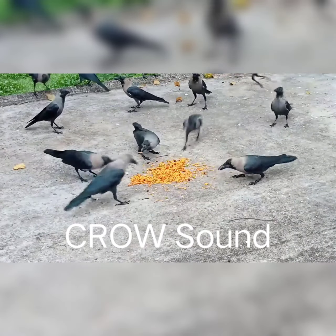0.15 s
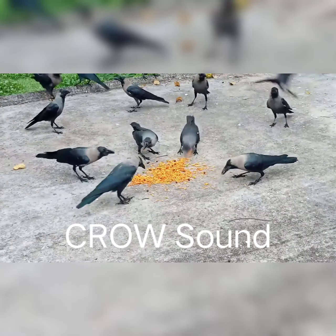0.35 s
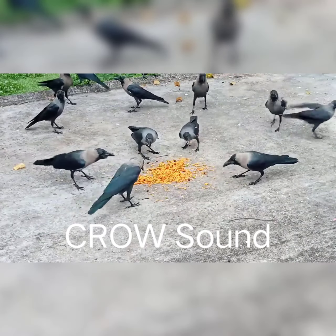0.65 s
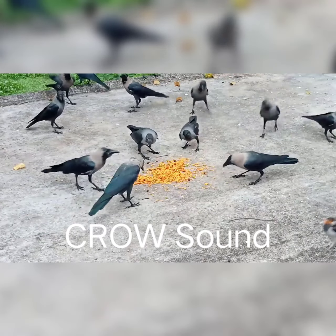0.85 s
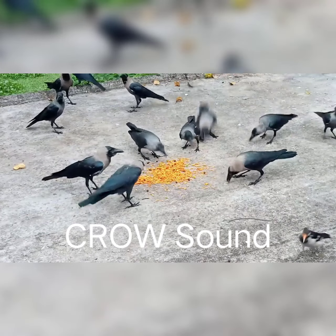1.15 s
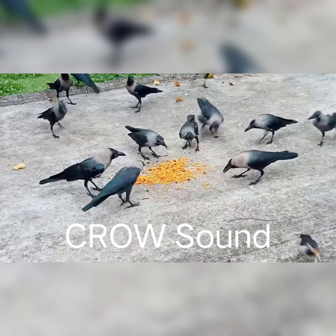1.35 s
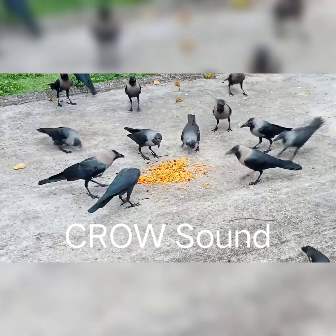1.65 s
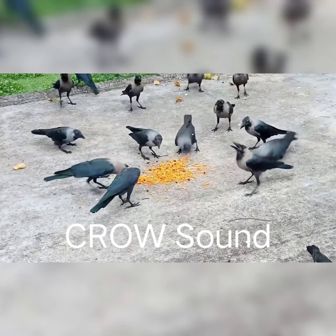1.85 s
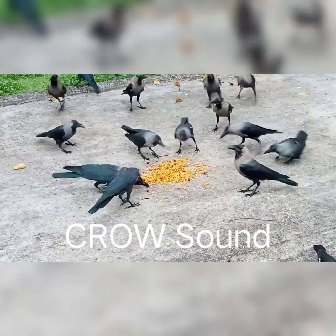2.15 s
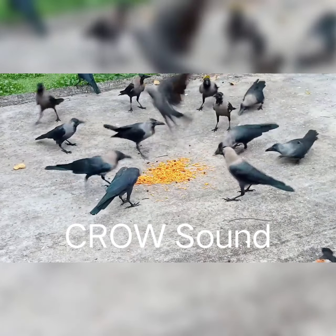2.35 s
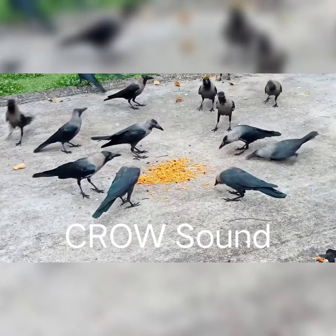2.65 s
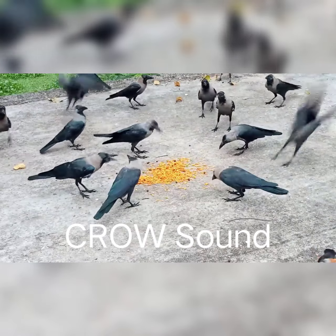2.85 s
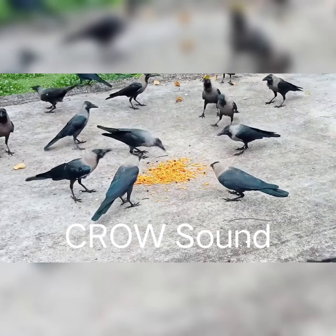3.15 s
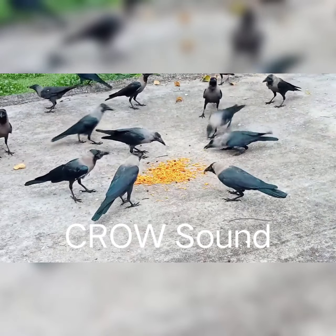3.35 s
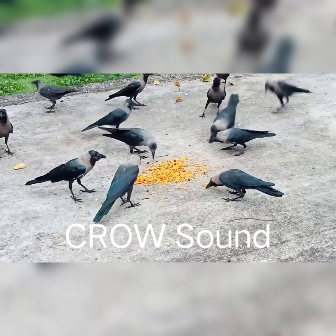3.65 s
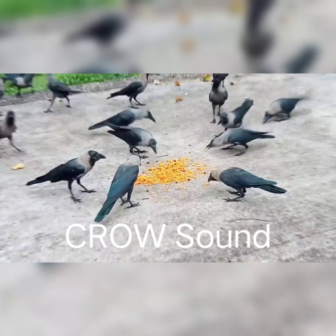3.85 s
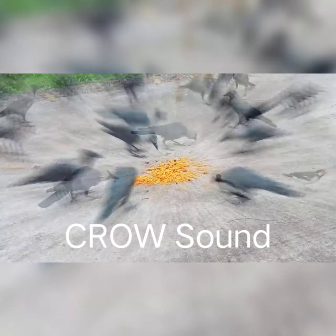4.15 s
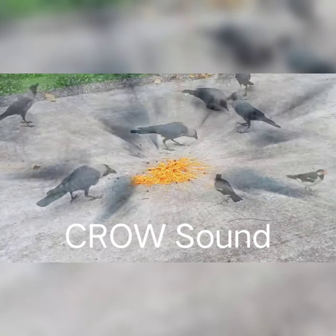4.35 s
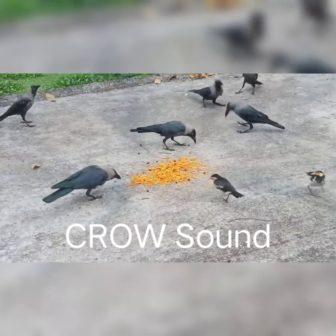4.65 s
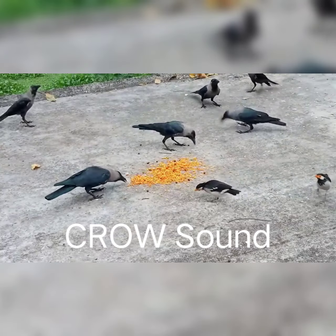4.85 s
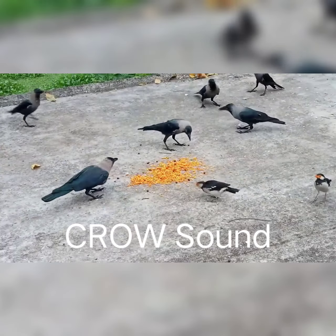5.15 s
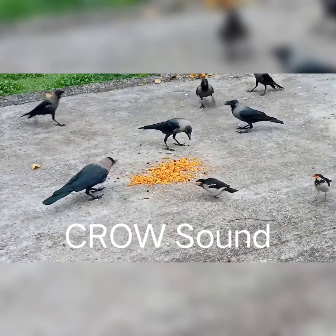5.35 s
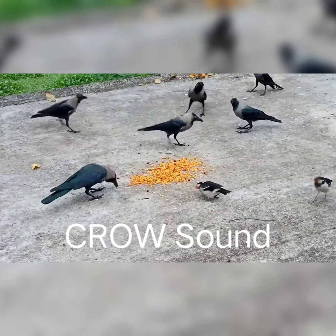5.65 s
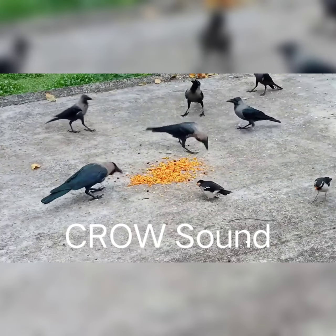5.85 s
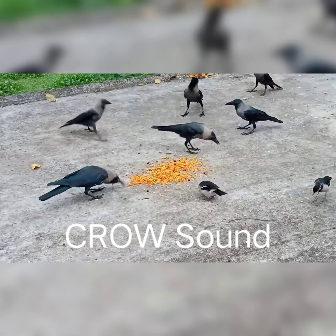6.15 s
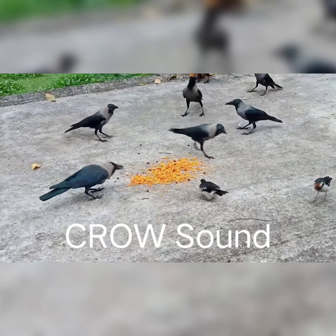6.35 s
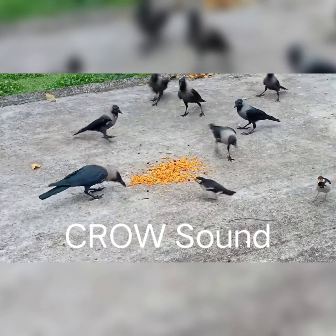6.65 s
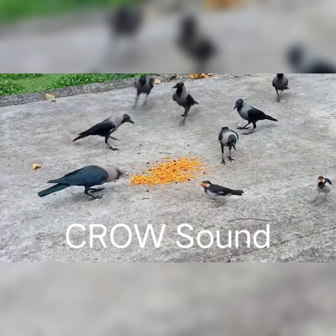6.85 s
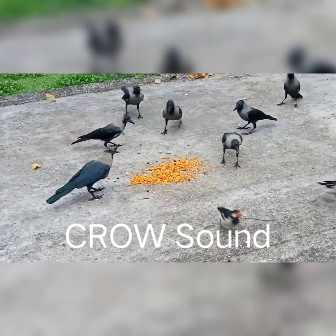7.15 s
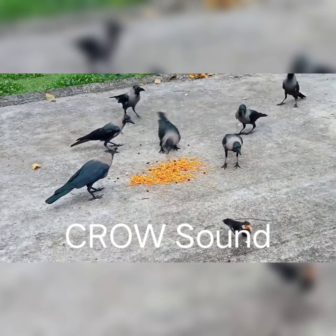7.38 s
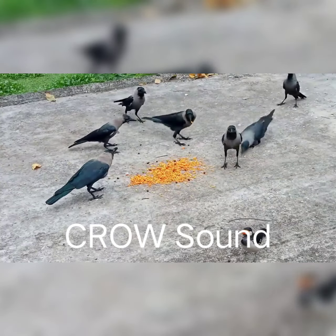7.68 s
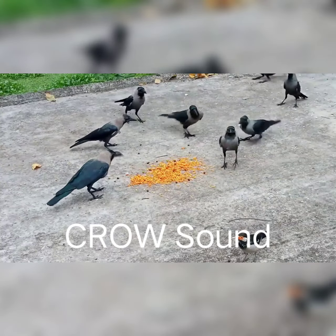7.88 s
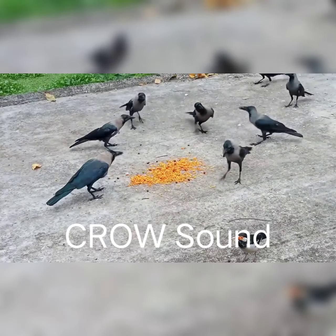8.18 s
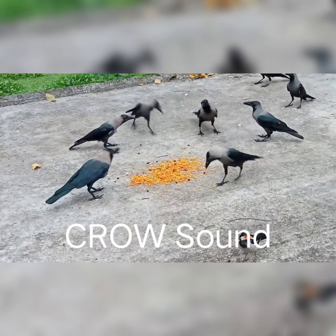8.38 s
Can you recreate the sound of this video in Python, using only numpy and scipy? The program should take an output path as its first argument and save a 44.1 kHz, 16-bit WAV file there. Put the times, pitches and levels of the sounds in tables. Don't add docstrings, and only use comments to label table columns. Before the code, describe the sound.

Harsh nasal caws, each about a third of a second, arch up and collapse in pitch, some near and bright, others duller. They crowd the first two seconds, then space out; one loud caw comes before an abrupt scene change. Afterwards there are few calls, low wind thumps and sparse pecking clicks until several caws return at the end. Faint small birds and distant cooing sit behind, with slight outdoor echo.

```python
import sys
import numpy as np
from scipy import signal
from scipy.fft import rfft, irfft, next_fast_len
from scipy.io import wavfile
from scipy.ndimage import uniform_filter1d, map_coordinates

SR = 44100
rng = np.random.default_rng(int(sys.argv[2]) if len(sys.argv) > 2 else 0)


def volts(x):
    e = np.asarray(x, float) / 20
    return 10 ** e


def store_wav(level_fs):
    pcm = np.round(np.clip(np.atleast_2d(level_fs), -1, 1) * 32767)
    wavfile.write(sys.argv[1], SR, pcm.T.astype(np.int16))


N = 375732

# (start [s], length [s], top pitch [Hz], top level [dB], loss by
# tiring [dB])
CAWS = [(-.07, .3, 510.5, -19, 4.5), (0.511, 0.33, 544.3, -20.5, 6.5), (1.035, 0.29, 485.7, -22, 6.5),
        (1.413, 0.33, 554, -26, 5.5), (1.649, 0.3, 577.7, -21.5, 0), (1.987, 0.31, 513.7, -18, 5),
        (2.863, 0.29, 549.5, -21, 2.5), (3.738, 0.32, 534.3, -13, 5.5), (4.176, 0.31, 537.5, -37.5, 3),
        (4.394, 0.29, 513.6, -19, 1.5), (5.039, 0.35, 493, -52.5, 4), (6.085, 0.32, 520.2, -20.5, 1.5),
        (7.491, 0.3, 486.3, -33.5, 4), (7.839, 0.35, 524.4, -15, 6), (8.186, 0.295, 520.8, -18, 2.5),
        (-.2, 0.32, 479.4, -16.5, 5.5), (1.416, 0.29, 654, -28.5, 7), (1.99, 0.27, 443, -15.5, 4.5),
        (2.073, 0.27, 485, -20.5, 5.5), (4.348, 0.27, 465.4, -22.5, -1), (7.953, 0.31, 592, -26.5, -0.5),
        (1.583, 0.25, 476, -30.5, -6)]
# (onset stretch [times], pitch lost over the hold [share],
# part of that lost by mid-hold [share], chest fading [dB])
BENDS = [(1, 0.12, .4, 8.5), (1, 0.1, .5, 5.5), (1, 0.098, 0.19, 1), (1, 0.063, 0.12, -2),
         (1, .09, 0.27, 5.5), (1, 0.085, 0.42, 4.5), (1, 0.098, .25, 3.5), (.9, .16, .3, 10.5),
         (1, .08, 0.33, 2.5), (1, 0.11, .35, 8.5), (1.1, 0.097, .35, 9), (1.2, .08, .15, 6),
         (0.88, .1, 0.22, 5.5), (1.2, .17, 0.27, 9.5), (0.649, 0.16, .15, 12), (1.001, .09, .35, 5),
         (1, 0.1, 0.21, 0), (0.999, 0.057, 0.245, 7.5), (1, .12, 0.38, 9.5), (0.66, 0.046, .35, 5.5),
         (0.77, .07, .35, 8), (1.2, 0.088, 0.31, 1)]
FALLS = [1, 1, 1.1, 1, .55, .65, 1, 1.1, 1, .75, 1, 1, .9, 1.1, 1, 1, 1, .6, .6, 1, 1, .7]
# (time after the start [s], pitch [share], level [dB])
ONSET = [
    (0, .8, -27),
    (.022, .92, -9),
    (.06, 1, 0),
]
# (time before the end [s], pitch [share], level [dB])
COLLAPSE = [
    (.075, 1, 0),
    (.045, .9, -6),
    (.028, .73, -18),
    (.004, .45, -38),
]
# (flutter [Hz], pitch swing [share], throb [dB], rasp [0-1], beak resonance, or for
# the # two near 600 Hz a boost of the fundamental [Hz])
VOICES = [(80.3, 0.03, 3.5, 0.56, 3700), (71.4, 0.082, 1, 0.5, 4120), (76.8, 0.022, 3, 0.98, 5000),
          (81.5, 0.033, 1.5, 0.8, 3980), (70.43, 0.064, 1.5, 0.9, 602), (74, 0.042, -2, 0.38, 4040),
          (75.64, 0.047, 1, 0.6, 3940), (74.6, 0.035, 1, 0.9, 4260), (75, 0.083, 2, 0.84, 7600),
          (75.64, 0.063, 0, 0.6, 3820), (69.9, 0.054, 3, 0.76, 4000), (75.4, 0.043, 2, 0.9, 3770),
          (83.6, 0.072, 2, 0.42, 5100), (84.6, 0.038, 2.5, 1, 4300), (74.9, 0.077, 2, 0.7, 1740),
          (66.8, 0.115, 2, 0.3, 4000), (69.2, 0.098, 4, 0.18, 580), (66.4, 0.039, 5, 0.11, 3450),
          (69.7, 0.012, -1, 0.56, 2520), (80.9, 0.012, -6, 0, 4050), (83.3, 0.021, -5, 0.5, 4300),
          (70.7, 0.032, 4, 0.2, 3700)]
# (frequency [Hz], level [dB])
CROW_COLOUR = [(250, -76), (520, -32.5), (800, -12), (1080, -8.5), (1500, -3.5), (2050, 8), (2600, -7.5),
               (3400, -17.5), (4300, -20.5), (5140, -26), (7080, -11), (11300, -33), (16000, -37)]
TRACT_HZ = [1075, 1454, 2610, 7240]
TRACT_WIDTHS = [0.15, 0.26, 0.18, 1, 0.1]
# (chest [dB], throat [dB], mouth [dB], hiss [dB], beak or boosted fundamental
# [dB])
TRACTS = [(4.5, -13.5, -11, -13.5, -12), (11.5, 7, 4, -2.5, 4), (2, -10.5, -9.5, -10.5, -6),
          (-1.5, 2.5, 4, 1, 17), (7.5, 0.5, 12.5, 11.5, 17.5), (14.5, 2, 3.5, 1.5, 10),
          (13.5, 10, 2.5, 4.5, 8.5), (7.5, -8.5, 7.5, -6.5, 11), (6.5, 9, 10, -12.5, -30),
          (6, -5.5, -2, -2, 3.5), (19, 18, 10, 8, -4.5), (5.5, -1.5, -6.5, -4.5, 5.5),
          (-1, -14, -9, -13.5, -2), (7, -9, 4.5, -6.5, 10), (5, -13.5, -2.5, -9, 2.5),
          (16, 1.5, 13, 9.5, 5), (10.5, 21.5, 23, -6, 25.5), (-68, 4, -8, -15, 9),
          (-31, -26, -11, -7, 16.5), (-44, -8.5, -8, -19, 17), (-32, 0, -0.5, 0.5, 11), (-9, 0, 6, 0, 3)]
FACING = [-40, -42.5, 1.5, 4, 7, 8.5, 7, -23.5, -25, 8.5, 5, 8.5, 5, 3, -0.5, 9, -12.5, 5, 1, -2, 5, 1]
# (throat [Hz], strength [dB], beak [Hz], strength [dB], beak [Hz], strength [dB])
POCKETS = [(2130, 5, 3120, 5, 4280, 6), (2020, 4, 4060, 7, 4700, 7), (1890, 4, 3390, 5, 4030, 8),
           (2190, 5, 2610, 3, 3990, 7), (2290, 4, 2720, 4, 3530, 4), (1760, 4, 3400, 4, 4000, 8),
           (1750, 7, 2840, 7, 4130, 8), (2090, 4, 3190, 4, 4290, 5), (2100, 3, 2490, 7, 3400, 6),
           (1930, 4, 3130, 5, 3950, 5), (2000, 2, 3000, 2, 4000, 2), (2010, 5, 3900, 9, 4280, 8),
           (1850, 3, 3100, 6, 4100, 6), (2070, 4, 3100, 7, 4300, 7), (1820, 5, 2690, 4, 4250, 6),
           (2500, 4, 2750, 4, 3600, 2), (1290, 3, 2200, 2, 4000, 2), (1780, 4, 2280, 2, 4030, 4),
           (2090, 3, 2750, 5, 4030, 5), (2250, 3, 2770, 4, 4300, 3), (2350, 5, 2690, 6, 3410, 4),
           (1840, 3, 2300, 2, 4300, 2)]
# (frequency [Hz], strength [dB])
NOSTRILS = [(7080, 4), (7560, 3)]
# (time [s], rustle [dB])
STIR = [(0, -41), (.35, -48.5), (.7, -43), (.95, -58.5), (1.36, -54.5), (1.97, -41.5), (2.4, -53),
        (2.7, -56.5), (3.4, -60), (3.72, -49), (4.44, -50.5), (4.6, -44), (4.85, -61), (6, -63.5),
        (6.55, -58), (7.1, -66), (7.6, -58.5), (8.53, -47.5)]
# (middle [s], half length [s], peak [dB])
GUSTS = [(4.464, 0.0072, -33), (4.6, 0.095, -39.5), (4.934, 0.025, -34.5), (5.056, 0.075, -38),
         (5.139, 0.045, -29), (5.21, 0.0075, -29), (5.308, 0.035, -39.5), (5.426, 0.036, -36),
         (5.5, 0.02, -39), (5.662, 0.084, -45.5), (5.871, 0.017, -45.5), (5.961, 0.022, -49),
         (6.285, 0.25, -49.5), (6.477, 0.025, -38.5), (6.641, 0.041, -38), (7.002, 0.039, -59),
         (7.749, 0.037, -53), (7.856, 0.026, -47.5), (8.152, 0.072, -59), (8.424, 0.028, -35),
         (8.496, 0.0074, -46)]
# (frequency [Hz], level [dB])
TOWN_COLOUR = [(25, -42.5), (60, -15.5), (98, 3.5), (129, -4.5), (165, -5), (201, -0.5), (260, -8.5),
               (600, -10.5), (900, -16), (2000, -22), (4000, -71)]
# (frequency [Hz], level [dB])
RUSTLE_COLOUR = [(800, -14.5), (1500, 11), (2300, 14), (3500, 16.5), (4200, 9), (5100, -2), (6300, 6.5),
                 (7570, 12), (9300, 1), (10400, -1), (16000, -10)]
# (frequency [Hz], level [dB])
BUFFET_COLOUR = [(12, -80.5), (20, -66), (32, -44), (56, -11.5), (97, -6), (236, -26), (400, -40),
                 (520, -74), (880, -120)]
# (frequency [Hz], decay time [s])
WALL_DECAY = [(500, 0.13), (2000, 0.39), (4000, 0.39), (12000, 0.088)]
# (start [s], length [s], top pitch [Hz], last pitch [Hz], level [dB])
CHIRRS = [(.755, 0.12, 3420, 3270, -45), (.655, 0.07, 3380, 3250, -49), (.56, .09, 4100, 4000, -51),
          (.64, .02, 3750, 3600, -44), (3.51, .17, 3950, 4350, -60), (3.67, 0.11, 3400, 4200, -48),
          (.13, .28, 3880, 3830, -57), (.18, .29, 4980, 4780, -60), (.3, .17, 3450, 3600, -56),
          (.2, .2, 4450, 4400, -62), (.78, .07, 3760, 3720, -57), (.87, .08, 3350, 3300, -57),
          (3.5, .13, 2950, 3000, -62), (.2, .12, 3400, 3350, -60), (.478, .04, 3300, 3250, -54),
          (.475, .03, 3900, 3800, -58), (4.32, .13, 4450, 4150, -56), (4.21, .07, 5500, 5350, -67),
          (.71, .08, 4750, 4700, -58), (2.81, .03, 3650, 3650, -63), (2.37, .16, 3500, 3400, -63),
          (6.72, .1, 3500, 3700, -66)]
# (start [s], length [s], top pitch [Hz], last pitch [Hz], level [dB])
WHISTLES = [
    (.33, 0.06, 2380, 2300, -46.5),
    (1.27, 0.095, 3230, 3230, -45.5),
    (2.64, 0.059, 2335, 2350, -55),
    (5.96, 0.12, 1013, 940, -61),
    (7.41, 0.057, 985, 970, -57),
]
# (start [s], length [s], top pitch [Hz], last pitch [Hz], level [dB])
DOVE = [
    (2.36, 0.5, 784, 638, -63),
    (3.6, 0.52, 703, 638, -60.5),
    (4.23, 0.15, 638, 622, -58),
    (5.2, 0.1, 626, 613, -63),
    (5.5, 0.145, 740, 670, -65.5),
    (5.92, 0.47, 799, 666, -62.5),
    (7.095, 0.068, 672, 660, -63.5),
    (7.135, 0.1, 742, 738, -63),
    (7.235, 0.353, 703, 645, -62),
]
# (time [s], peak [dB], knock [dB])
TICKS = [(0.178, -23.5, 4.5), (0.4683, -35, -24), (0.508, -24.5, -1), (0.6494, -21, 8), (0.846, -34.5, -27),
         (1.3646, -48.5, -11), (2.3564, -33.5, -34), (2.5045, -23.5, 3.5), (2.5818, -29.5, -26),
         (2.731, -41, -18), (2.781, -41, 0), (3.2426, -40, -49), (3.313, -45, -26.5), (3.408, -33, -13),
         (3.467, -38, -10.5), (3.4774, -30.5, -1), (3.5197, -37.5, 3.5), (3.611, -34, -17), (3.624, -43, 5),
         (3.654, -34, -6), (3.689, -36, -6.5), (4.121, -39, -8), (4.151, -26.5, -27), (4.1636, -33, -22),
         (4.196, -36, 0), (4.383, -25.5, -27), (0.2534, -33.5, -20), (.49, -52, -20), (.861, -54, -20),
         (.9373, -51, -22), (2.4279, -40, -22), (2.4616, -46, -20), (2.4773, -35.5, -20),
         (3.0706, -24.5, -22), (3.2745, -45.5, -22), (3.5428, -48, -12), (4.09, -37.5, -10),
         (4.2921, -40.5, -15),
         (4.9505, -42, -3), (5.1847, -29, -11), (5.3652, -49.5, -5), (6.5165, -31, 10.5),
              (6.5202, -28.5, 8), (6.5354, -47, 23), (6.6247, -48, -3.5), (6.8342, -38, -4),
              (6.8658, -42.5, -18.5), (7.107, -39, -20), (7.2965, -41, -29), (7.341, -40, 7.5),
              (7.5183, -39, 10), (7.599, -35.5, 7), (5.6636, -47, -15), (6.7314, -47, -10),
              (6.9212, -49, -11.5), (7.3907, -55, -15), (7.494, -48.5, 10), (7.5395, -44, -3.5),
              (7.675, -37, -27), (7.755, -40, -25), (7.801, -47, -23), (7.812, -40, -9)]
# (frequency [Hz], level [dB])
GRIT_COLOUR = [(1200, -42), (2500, -24), (3500, 3.5), (5000, -14), (7300, -0.5), (11000, -14), (16000, -11)]

CUT_S = 4.455
TOP_HZ = 15650
OVERTONES = np.arange(1, 31)[:, None]
SHAKEN_UP_TO = 7
CHEST_HZ = 1250
SHEEN_HZ, SHEEN_WIDTH = 13420, 0.4
RIPPLE_DB = 4.5
POCKET_WIDTH_HZ = 140
HISS_SINKS = 1.04
TOWN_DB, TOWN_FOLLOWS = -53.5, 0.13


def unit(x):
    return x / np.sqrt(np.mean(x ** 2) + 1e-20)


def along(points, hz):
    f, v = np.transpose(points)
    return np.interp(np.log(hz + 1), np.log(f + 1), v)


def span(rows):
    s, *cols = np.transpose(rows)
    first = round(s[0] * SR)
    t = np.arange(first, min(N, round(s[-1] * SR))) / SR
    return first, *[np.interp(t, s, c) for c in cols]


def wobble(rate, size=N):
    knots = rng.standard_normal(int(size * rate / SR) + 4)
    return map_coordinates(knots, [np.arange(size) * rate / SR])


def filtered(x, gain):
    m = next_fast_len(len(x) + 8192)
    return irfft(rfft(x, m) * gain(np.fft.rfftfreq(m, 1 / SR)), m)[:len(x)]


def bump(hz, centre_hz, width):
    return np.exp(-(np.log((hz + 1) / centre_hz) / width) ** 2)


def soft(size, s):
    k = np.arange(size)
    return np.clip(np.minimum(k + 1, size - k) / (s * SR), 0, 1)


def arch(start, length, pitch_hz, db, tiring_db, stretch, sag, halfway, fall):
    onset = [(s * np.clip(stretch, .6, 1.6), share, level) for s, share, level in ONSET]
    middle = (onset[-1][0] + length - COLLAPSE[0][0]) / 2
    rows = onset + [(middle, 1 - halfway * sag, -tiring_db / 2)]
    rows += [(length - s, share * (1 - sag), fall * level - tiring_db) for s, share, level in COLLAPSE]
    return [(start + s, pitch_hz * share, db + level) for s, share, level in rows]


def throat(beak_hz, tract_db, sheen_db):
    cavities = rng.standard_normal(110)

    def gain(hz):
        db = along(CROW_COLOUR, hz) + sheen_db * bump(hz, SHEEN_HZ, SHEEN_WIDTH)
        for centre_hz, width, strength_db in zip(TRACT_HZ + [beak_hz], TRACT_WIDTHS, tract_db):
            db = db + strength_db * bump(hz, centre_hz, width)
        db = db + RIPPLE_DB * np.interp(hz, np.linspace(0, SR / 2, 110), cavities) * (hz > 4800)
        return volts(db)
    return gain


def ringing(pockets):
    def gain(f):
        total = 1
        for c, db in pockets:
            damping = 1j * f * POCKET_WIDTH_HZ
            total = total * (1 + (volts(db) - 1) * damping / (c * c - f * f + damping))
        return total
    return gain


def overtone_sizes(pitch_hz, swing, slack, chest_db, tract):
    sinking = 1 + np.clip(2.2 * slack, 0, .85) * slack / (1 - slack)
    seen_hz = OVERTONES * (pitch_hz * (1 + swing) * sinking)[::64]
    sizes = tract(seen_hz) * volts(-52 * slack[::64] * np.log2(OVERTONES / 2))
    sizes *= volts(.9 * uniform_filter1d(rng.standard_normal(sizes.shape), size=4, axis=1) * 2)
    sizes *= volts(1.5 * np.cos(np.pi * OVERTONES) * (OVERTONES > 4))
    sizes *= volts(1.5 * rng.standard_normal(OVERTONES.shape) * (OVERTONES > 9))
    spent = np.linspace(0, 1, sizes.shape[1]) ** 2
    return sizes * volts(-1.8 * chest_db * spent * (OVERTONES * pitch_hz.max() < CHEST_HZ))


def caw(pitch_hz, chest_db, voice, tract_db, sheen_db, pockets):
    flutter_hz, depth, throb_db, rasp, beak_hz = voice
    n = len(pitch_hz)
    pitch_hz = uniform_filter1d(pitch_hz, size=500, mode="nearest")
    slack = 1 - pitch_hz / pitch_hz.max()
    beat = 2 * np.pi * np.cumsum(flutter_hz * (1 + .02 * wobble(30, size=n))) / SR
    swing = depth * (1 - slack) ** 2 * np.sin(beat) + .009 * rasp * wobble(250, size=n)
    unsteady = 1 + (.004 + .006 * rasp) * wobble(250, size=n)
    turn = 2 * np.pi * np.cumsum(pitch_hz * unsteady) / SR
    shaken = np.minimum(OVERTONES, SHAKEN_UP_TO) * 2 * np.pi * np.cumsum(pitch_hz * swing) / SR
    tract = throat(beak_hz, tract_db, sheen_db)

    sizes = overtone_sizes(pitch_hz, swing, slack, chest_db, tract)
    starts = rng.uniform(0, 2 * np.pi, size=OVERTONES.shape)
    waves = np.cos(OVERTONES * turn + shaken + starts)
    tone = (np.repeat(sizes, 64, axis=1)[:, :n] * waves).sum(axis=0)

    def airy(hz):
        share = min(rasp, .6) * ((hz + 1) / 2000) ** -.05
        return np.clip(share * (1 - .4 * bump(hz, 3800, .45)), 0, .9)

    air = unit(rng.standard_normal(n) * (1 + .6 * np.cos(turn))) * volts(9 - 35 * slack)
    high_hiss = filtered(air, lambda hz: tract(hz) * airy(hz))
    low_hiss = filtered(air, lambda hz: tract(hz * HISS_SINKS) * airy(hz))
    sunk = np.linspace(0, 1, n)
    hiss = (1 - sunk) * high_hiss + sunk * low_hiss

    throb = volts(throb_db * np.sin(beat + 1.45) + 0.27 * wobble(147.3, size=n))
    sound = throb * tone + np.sqrt(throb) * hiss
    throat_pocket, *beak_pockets = np.reshape(pockets, (-1, 2))
    nostrils = [(hz * rng.normal(1, .015), db) for hz, db in NOSTRILS]
    sound = filtered(sound, ringing([throat_pocket] + nostrils))
    closing = np.linspace(0, 1, n) ** 2
    sound = closing * sound + (1 - closing) * filtered(sound, ringing(beak_pockets))
    return sound / np.sqrt(np.abs(uniform_filter1d(sound ** 2, size=1200)) + 1e-12)


def crows():
    out = np.zeros(N + SR)
    birds = zip(CAWS, BENDS, FALLS, VOICES, TRACTS, FACING, POCKETS)
    for row, (*bend, chest_db), fall, *bird in birds:
        at, pitch_hz, db = span(arch(*row, *bend, fall))
        n = len(db)
        late = (at + np.arange(n)) / SR > CUT_S
        heard = uniform_filter1d(1. * (late == late[n // 2]), size=70, mode="nearest")
        out[SR + at:][:n] += heard * volts(db) * soft(n, 0.00149) * caw(pitch_hz, chest_db, *bird)
    return out[SR:]


def rush(spectrum, patchy_db):
    z = signal.stft(rng.standard_normal(N), nperseg=512)[2]
    field = uniform_filter1d(rng.standard_normal(z.shape), size=8, axis=0)
    field = uniform_filter1d(field, size=10, axis=1)
    patchy = signal.istft(z * volts(patchy_db * unit(field)), nperseg=512)[1][:N]
    return unit(filtered(patchy, lambda hz: volts(along(spectrum, hz))))


def yard():
    _, rustle_db = span(STIR)
    t = np.arange(N) / SR
    town_db = TOWN_DB + TOWN_FOLLOWS * (rustle_db - rustle_db.mean()) + 0.63 * wobble(7.2)
    town = volts(town_db) * rush(TOWN_COLOUR, patchy_db=0.84)
    rustle = volts(rustle_db + 0.37 * wobble(25)) * rush(RUSTLE_COLOUR, patchy_db=2.2)
    puffs = sum(volts(db) * np.exp(-((t - s) / half) ** 2) for s, half, db in GUSTS)
    wind = unit(volts(1.1 * wobble(16)) * rush(BUFFET_COLOUR, patchy_db=3.5))
    return town + rustle + puffs * wind


def walls(x):
    hz, t, z = signal.stft(rng.standard_normal(SR), SR, nperseg=256)
    fading = volts(-60 * t / along(WALL_DECAY, hz)[:, None])
    tail = signal.istft(z * fading, SR, nperseg=256)[1]
    delayed = np.pad(x, (500, 0))
    return signal.fftconvolve(delayed, tail / np.linalg.norm(tail))[:N]


def whistled(calls, blur, flicker, scoop, fade_db):
    out = np.zeros(N)
    for s, length, top_hz, last_hz, level in calls:
        begin = (s, scoop * top_hz, level + 2.5)
        top = (s + min(.035, length / 2), top_hz, level)
        end = (s + length, last_hz, level - fade_db)
        at, hz, db = span([begin, top, end])
        n = len(db)
        turn = 2 * np.pi * np.cumsum(hz * (1 + blur * wobble(flicker, size=n))) / SR
        loudness = np.sqrt(2) * volts(db + 2.5 * wobble(60, size=n))
        out[at:at + n] += loudness * soft(n, 0.022) * np.sin(turn)
    return out


def ticks():
    crack, knock = np.zeros(N + SR), np.zeros(N + SR)
    t = np.arange(SR // 25) / SR
    for s, db, knock_db in TICKS:
        at = round(s * SR)
        burst = rng.standard_normal((2, len(t))) * (1 - np.exp(-t / 0.00015))
        crack[at:][:len(t)] += burst[0] * volts(db + 0.5 - 60 * t / 0.037)
        knock[at:][:len(t)] += burst[1] * volts(db + min(knock_db, 12) + 6.0 - 60 * t / 0.033)
    gritty = filtered(crack[:N], lambda hz: volts(along(GRIT_COLOUR, hz)))
    return gritty + filtered(knock[:N], lambda hz: bump(hz, 1800, .5))


def scene():
    near = crows() + ticks()
    dove = whistled(DOVE, blur=0.016, flicker=210, scoop=0.93, fade_db=-6)
    far = whistled(WHISTLES, blur=0.013, flicker=110, scoop=1.0, fade_db=19)
    far += whistled(CHIRRS, blur=.02, flicker=300, scoop=.96, fade_db=4)
    echo = volts(-13.5) * walls(near + 2 * dove)
    far_echo = volts(-0.5) * walls(far)
    return (near + volts(4.5) * dove + far + echo + far_echo + yard())[None]


def top_cut(x):
    return signal.sosfilt(signal.butter(12, 16760, fs=SR, output="sos"), x)


def record(dry):
    mix = filtered(dry[0], lambda hz: hz < TOP_HZ)[None]
    return top_cut(mix)


dry = scene()
out = record(dry)
store_wav(out)
```